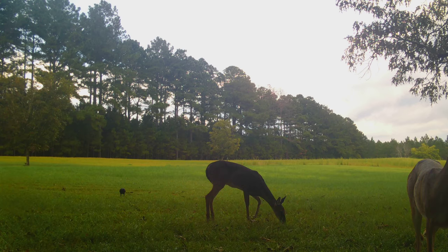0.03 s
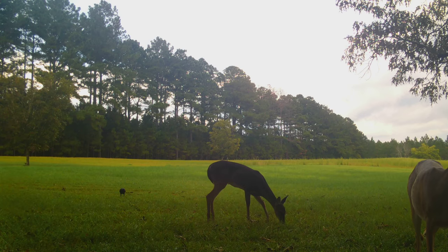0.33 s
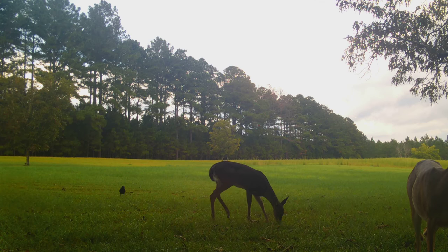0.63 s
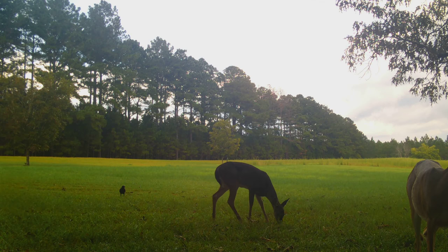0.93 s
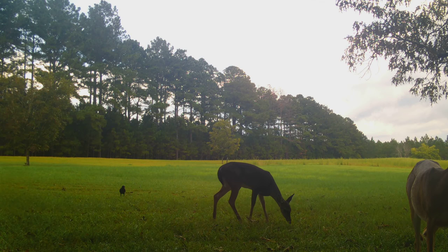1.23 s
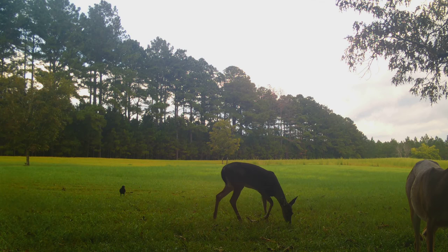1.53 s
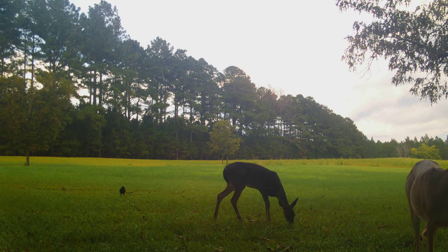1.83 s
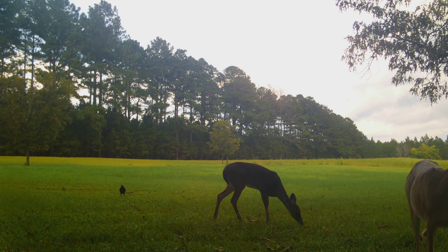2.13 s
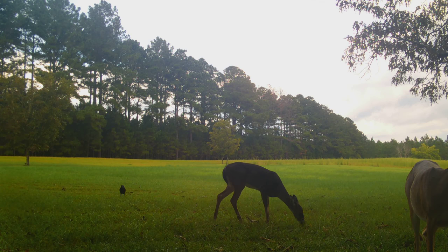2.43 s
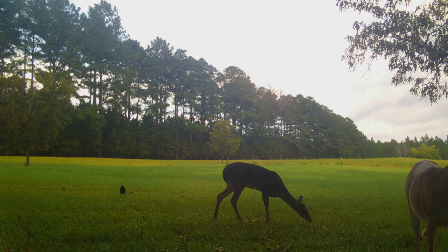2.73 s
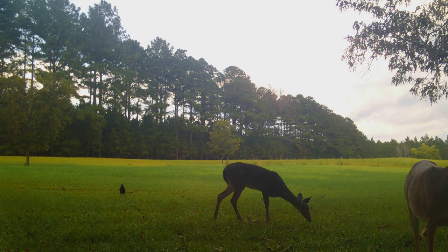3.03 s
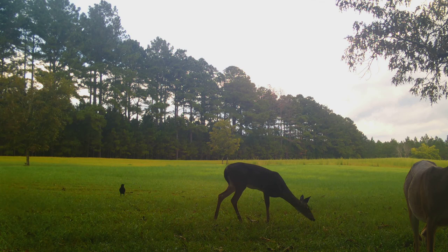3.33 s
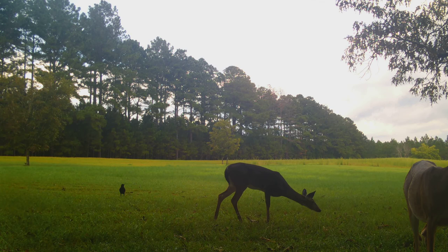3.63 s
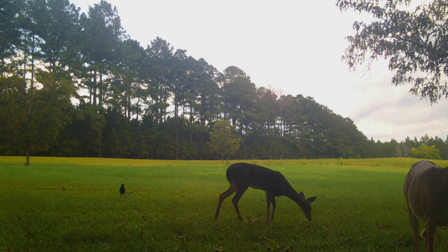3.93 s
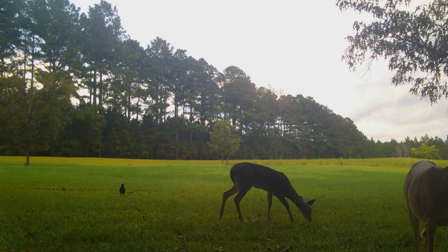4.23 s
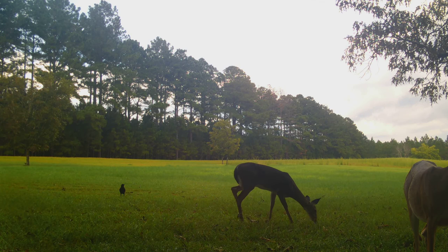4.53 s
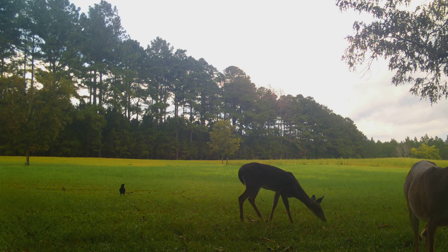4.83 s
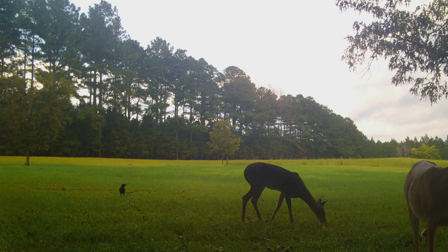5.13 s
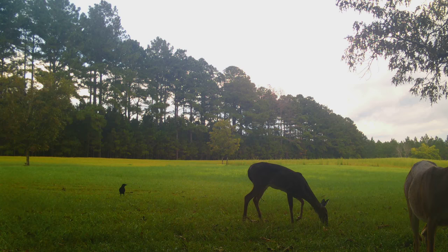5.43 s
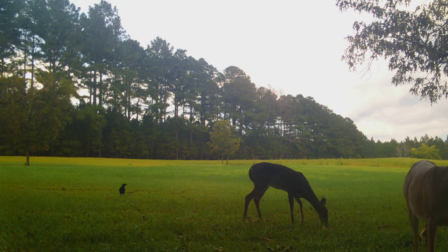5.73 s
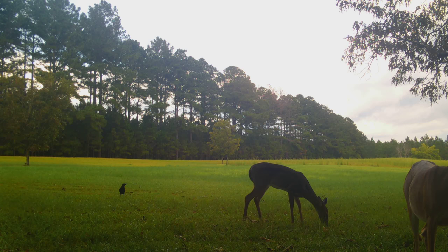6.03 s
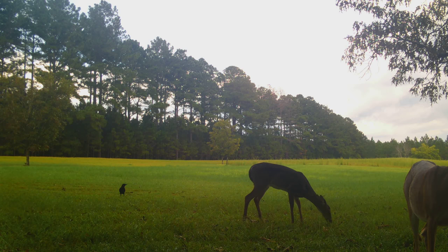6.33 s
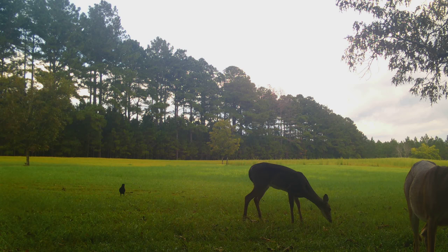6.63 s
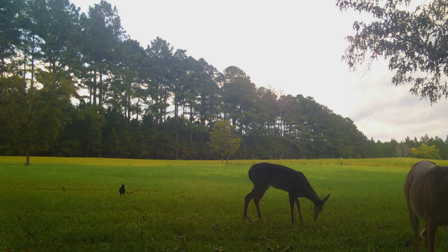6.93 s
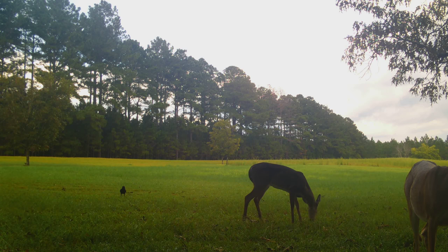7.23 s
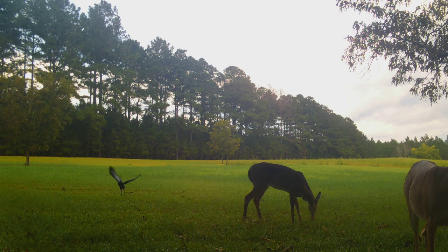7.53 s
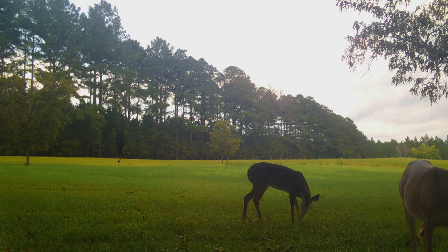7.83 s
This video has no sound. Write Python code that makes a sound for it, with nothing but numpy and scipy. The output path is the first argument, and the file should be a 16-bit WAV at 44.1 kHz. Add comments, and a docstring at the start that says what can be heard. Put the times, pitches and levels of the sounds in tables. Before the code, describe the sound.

A nearby crow caws harshly and a distant one answers over faint insect hiss, with small twig snaps and soft wingbeats.

```python
"""Two crows caw three times each at the edge of a meadow, heard through one mono microphone.
The near one is harsh and bright, the one across the field has a fast trill; both voices are puffs
of air from the syrinx ringing in the throat. The tree line answers faintly. Insects hiss over a low
outdoor rumble, grass tears and twigs snap as deer graze, and a bird flaps off at the end."""
import sys
import numpy as np
from scipy import signal
from scipy.fft import rfft, irfft, next_fast_len
from scipy.io import wavfile
from scipy.ndimage import uniform_filter1d, map_coordinates

SR = 44100
rng = np.random.default_rng(int(sys.argv[2]) if len(sys.argv) > 2 else 0)


def dump(signal):
    """Clip the signal to [-1, 1] and save it as 16-bit WAV at the path in sys.argv[1]."""
    limited = np.clip(np.atleast_2d(signal).T, -1, 1)
    pcm = np.round(limited * 32767).astype(np.int16)
    wavfile.write(sys.argv[1], SR, pcm)


N = 347508
TIME = np.arange(N) / SR
TOP_HZ = 15800


def amp(db):
    """Decibels to gain."""
    return 10 ** (np.asarray(db) / 20)


def unit(x):
    """Scale to rms 1."""
    return x / np.sqrt(np.mean(x ** 2) + 1e-20)


def steady(x, size=900):
    """Hold the short-time rms at 1."""
    return x / np.sqrt(np.abs(uniform_filter1d(x * x, size)) + 1e-12)


def along(points, hz):
    """Read (Hz, value) points on a log axis."""
    freqs, values = np.transpose(points)
    return np.interp(np.log(hz + 1), np.log(freqs + 1), values)


def ramp(t, begin, length):
    """Rise from 0 to 1 over length seconds."""
    return np.clip((t - begin) / length, 0, 1)


def swell(centre, width):
    """A bell of gain; width is its standard deviation in seconds."""
    return np.exp(-.5 * ((TIME - centre) / width) ** 2)


def gate(t, edge):
    """Short fades at both ends of a call."""
    return np.clip(np.minimum(t - t[0], t[-1] - t) / edge, 0, 1)


def wobble(t, rate):
    """A smooth random curve with rate knots a second."""
    knots = rng.standard_normal(4096)
    return map_coordinates(knots, [(t - t[0]) * rate], mode="wrap")


def add(track, start, x):
    """Mix x into the track from start seconds."""
    part = track[max(round(start * SR), 0):][:len(x)]
    part += x[:len(part)]


def noise(spectrum):
    """Noise of rms 1 with the given colour."""
    size = next_fast_len(N + 8192)
    gain = amp(along(spectrum, np.fft.rfftfreq(size, 1 / SR)))
    return unit(irfft(rfft(rng.standard_normal(size)) * gain, size)[:N])


def resonate(x, spectrum, size=2048):
    """Ring x through a causal filter of the given colour."""
    gain = amp(along(spectrum, np.fft.rfftfreq(size, 1 / SR)))
    cepstrum = irfft(np.log(gain))
    cepstrum[1:size // 2] *= 2  # fold to minimum phase
    cepstrum[size // 2 + 1:] = 0
    impulse = irfft(np.exp(rfft(cepstrum)))
    return signal.fftconvolve(x, impulse)[:len(x)]


# Open air and two insect choruses around the microphone. Each row: frequency in Hz, density in dB.
AIR_SPECTRUM = [(12, -37), (20, -1), (65, -0.5), (86, -2.5), (196, -4), (250, -6), (456, -10), (1480, -20),
                (3430, -27), (4000, -25), (5200, -24.5), (8800, -120)]
LOW_CHORUS = [(3000, -14.5), (4500, -12.5), (5700, -6.5), (6600, -0.5), (7300, -6.5), (8200, -9),
              (9500, -31.5)]
HIGH_CHORUS = [(8000, -25.5), (9200, -6), (9900, -0.5), (10350, 1.5), (11000, -5), (11500, -16),
               (13000, -22)]


def meadow():
    """Distant rumble, faint hum, even hiss and insects; the low chorus fades, the high one holds."""
    rumble_db = -56.5 + 2 * ramp(TIME, begin=6, length=1.4)
    rumble = amp(rumble_db) * noise(AIR_SPECTRUM)
    hum = amp(-66) * noise([(50, -31), (58, -6), (66, -19), (20000, -120)])
    hiss = amp(-64) * noise([(1000, -10.5), (4000, -11), (9000, 0), (12000, -9), (16000, -9.5)])
    shimmer = amp(.4 * wobble(TIME, 12))
    low_db = -56.3 - .5 * TIME - 7 * ramp(TIME, begin=6.66, length=.65)
    low_insects = amp(low_db) * shimmer * noise(LOW_CHORUS)
    high_insects = amp(-58 + .6 * wobble(TIME, 30)) * noise(HIGH_CHORUS)
    return rumble + hum + hiss + low_insects + high_insects


# Twigs breaking. Each row: start in seconds, peak in dB, crack in Hz, wood against crack in dB.
TWIG_SNAPS = [(.158, -44.5, 3300, -25), (1.765, -45, 4500, -12), (4.119, -45, 3500, -2),
              (5.679, -41, 4200, -9), (6.684, -40, 12500, -30), (6.732, -35, 9800, -28),
              (7.128, -45, 8000, -20), (7.344, -32, 5500, 0)]
# A dry twig's body. Each row: frequency in Hz, gain in dB.
TWIG_BODY = [(700, -25), (1200, -2), (1500, -9), (1950, 1), (2600, -15), (3500, -6), (6000, -26),
             (12000, -50)]


def twigs():
    """Each breaking stem is a brief crack over the ring of its wood."""
    track, t = np.zeros(N), np.arange(SR // 20) / SR
    for start, peak_db, hz, body_db in TWIG_SNAPS:
        burst = rng.standard_normal(len(t)) * (amp(-60 * t / .0074) + amp(-24 - 60 * t / .032))
        colour = [(hz / 4, -24), (hz * .71, -8), (hz, 0), (hz * 1.43, -10), (hz * 2.2, -30)]
        crack = unit(resonate(burst, colour))
        snap = crack + amp(body_db) * unit(resonate(burst, TWIG_BODY))
        add(track, start, amp(peak_db) * snap / np.abs(snap).max())
    return track


# Deer tugging at the grass. Each row: centre in seconds, width in seconds, level in dB.
GRASS_TUGS = [(.3, .06, -61), (.88, .046, -61), (1.745, .05, -57.5), (4.55, .05, -59), (5.67, .022, -58),
              (5.948, 0.051, -59), (6.38, .03, -63)]
# Tearing blades. Each row: frequency in Hz, density in dB.
GRASS_SPECTRUM = [(1500, -20), (3500, -4), (7000, 4), (12500, -1), (16000, -25)]


def grazing():
    """Blades of grass tear in small crackling clumps."""
    tugs = sum(amp(level_db) * swell(centre, width) for centre, width, level_db in GRASS_TUGS)
    return tugs * unit(noise(GRASS_SPECTRUM) * amp(4 * wobble(TIME, 400)))


def syrinx(phase, pitch, breath, count=40):
    """One sharp puff per cycle, with a burst of turbulence at each opening."""
    harmonic = np.arange(1, count + 1)[:, None]
    puffs = np.sum(np.cos(harmonic * phase) * (harmonic * pitch < TOP_HZ), axis=0)
    turbulence = rng.standard_normal(len(phase)) * (1 + np.cos(phase)) ** 2
    return unit(puffs) + breath * unit(turbulence)


def trill(t, rate_hz, drift):
    """A fast, slightly unsteady tremble of the voice."""
    hz = rate_hz * (1 + drift * wobble(t, 40.34))
    return np.sin(2 * np.pi * np.cumsum(hz) / SR)


def hollow(x, spacing_hz, share):
    """One close, inverted reflection cuts evenly spaced dips into the spectrum."""
    hz = np.fft.rfftfreq(len(x), 1 / SR)
    return irfft(rfft(x) * (1 - share * np.exp(-2j * np.pi * hz / spacing_hz)), len(x))


def near_gesture(t, length, top_hz, crest_db, swell_db):
    """Pitch and levels of a near caw: it climbs, sags, then collapses as the breath runs out."""
    climb_s, sag_hz_per_s, collapse_s, slack_hz = .061, 1520, .054, 262
    crest_s, beak_opens_s = .122, .04
    climb_left = 1 - ramp(t, 0, climb_s)
    pitch = top_hz * (1 - .29 * climb_left ** 1.55) - sag_hz_per_s * np.maximum(t - climb_s, 0)
    pitch += (slack_hz - pitch) * ramp(t, length - collapse_s, collapse_s) ** 1.3
    tone_db = -27.2 + .052 * (pitch - top_hz) - 1.8 * climb_left
    # the rasp swells to a crest, then fades ever faster
    rasp_db = crest_db - swell_db * (1 - ramp(t, 0, crest_s) ** 2)
    rasp_db -= 27 * ramp(t, crest_s, length - crest_s) ** 2.46
    # the throat rings until the beak opens wide
    ring_db = -6.5 - np.maximum(100 * (beak_opens_s - t), 520 * (t - beak_opens_s))
    return pitch, tone_db, rasp_db, ring_db


# The near crow's throat with beak open, with beak half shut, and its hoarse middle range.
# Each row: frequency in Hz, gain in dB.
OPEN_BEAK = [(1000, -43), (1450, -7.5), (2000, -16), (2700, -17), (3400, -13.5), (4100, -8), (4650, -10),
             (5050, 2), (6500, -1.5), (6950, -14.5), (7900, -7.5), (9500, -17), (11600, -27),
             (12200, -20.5), (12900, -28.5), (15200, -34), (16000, -50)]
HALF_SHUT_BEAK = [(2800, -35.5), (3230, -18), (3380, -5.5), (3540, -7), (3700, -13), (4200, -36.5)]
HOARSE_BAND = [(1100, -34.5), (1550, 3.5), (1850, 4.5), (2100, -7), (2400, 3.5), (2800, -13.5), (3200, -4),
               (4200, -0.5), (4900, -25)]
SCOOP_S = .014  # the voice slides up before the rasp breaks in


def near_caw(length, top_hz, crest_db, swell_db):
    """A trembling arch of pitch: two clean low partials, a hoarse middle and a bright rasp of puffs."""
    t = np.arange(-SCOOP_S, length, 1 / SR)
    pitch, tone_db, rasp_db, ring_db = near_gesture(t, length, top_hz, crest_db, swell_db)
    voiced = ramp(t, -SCOOP_S, SCOOP_S)
    tremble = 1 + .024 * trill(t, rate_hz=80, drift=.25) + .019 * wobble(t, 200)
    pitch = pitch * (.82 + .18 * voiced) * tremble
    phase = 2 * np.pi * np.cumsum(pitch) / SR
    # the second partial swells as it climbs into the throat's first resonance
    second_db = along([(900, -14), (1120, -7), (1320, 7.7), (1550, 8.7)], 2 * pitch)
    second = amp(second_db + 3.6 * wobble(t, 220)) * np.sin(2 * phase + .4 * wobble(t, 349.8))
    tone = amp(tone_db) * voiced ** 2 * steady(np.sin(phase) + second)
    # the puffs come unevenly, most of all when the voice is slack and low
    slack = np.interp(pitch, [350, 580], [.14, .035])
    uneven = phase + .05 * np.sin(phase / 2) + slack * wobble(t, 700)
    puffs = syrinx(uneven, pitch, breath=.2) * amp(.8 * np.cos(phase / 2) + .8 * wobble(t, 500))
    rasp = steady(hollow(resonate(puffs, OPEN_BEAK), spacing_hz=2355, share=.2))
    ring = amp(ring_db) * steady(resonate(puffs, HALF_SHUT_BEAK))
    # fluttering membranes chop the puffs and throw sidebands between the partials
    flutter = trill(t, rate_hz=210, drift=.2) + .5 * wobble(t, 300)
    hoarse = amp(-17) * steady(resonate(puffs * flutter, HOARSE_BAND))
    breaking = .22 * voiced + .78 * ramp(t, -.0022, .0028)
    rasp_gain = amp(rasp_db + 1.1 * wobble(t, 140) + .4 * wobble(t, 45)) * breaking
    return (tone + rasp_gain * (rasp + ring + hoarse)) * gate(t, edge=.004)


def puff(peak_db):
    """One lone opening of the syrinx, ringing in the throat."""
    t = np.arange(SR // 50) / SR
    burst = rng.standard_normal(len(t)) * amp(-60 * t / .0073)
    sound = resonate(burst, OPEN_BEAK) + .49 * resonate(burst, HALF_SHUT_BEAK)
    return amp(peak_db) * sound / np.abs(sound).max()


# Caws close to the microphone. Each row: start in seconds, length in seconds, top pitch in Hz,
# rasp at its crest in dB, swell up to the crest in dB.
NEAR_CALLS = [(2.064, .214, 764, -16.3, 3.6), (2.414, .226, 714, -18.4, 4), (2.857, .233, 716, -19, 3.6)]
# Lone puffs ahead of each caw. Each row: lead in seconds, relative level in dB.
VOICE_CATCH = [(.017, -13.5), (0.0085, -5), (0.0021, -11)]


def near_crow():
    """Three harsh caws at close range, the voice catching before each."""
    track = np.zeros(N)
    for start, length, top_hz, crest_db, swell_db in NEAR_CALLS:
        add(track, start - SCOOP_S, near_caw(length, top_hz, crest_db, swell_db))
        for lead, puff_db in VOICE_CATCH:
            add(track, start - lead, puff(crest_db - swell_db + puff_db + 9))
    return track


# Ring of the tree line. Each row: frequency in Hz, time to fall 60 dB in seconds.
TREE_DECAY = [(1100, 1.1), (1600, 1.8), (2200, 1.2), (3500, 3.4), (6000, 1.7), (12000, 0.81)]


def trees(near, far):
    """Nearby trunks and leaves scatter both crows, and the tree line answers from farther off."""
    scatter_t60s = [(500, .085), (1100, .2), (1500, .42), (2400, .25),
                    (3500, .4), (6000, .28), (12000, .28)]
    scatter = echo(amp(-8) * near + amp(-13.5) * far, scatter_t60s, rise=.018)
    woods = echo(amp(-26.5) * near + amp(-22.5) * far, TREE_DECAY, rise=.04)
    round_trip_s = .27
    add(woods, round_trip_s, amp(-7) * woods)
    return scatter + woods


def echo(x, t60s, rise):
    """A diffuse tail that builds up over rise seconds and dies at each frequency's own speed."""
    hz, t, bands = signal.stft(rng.standard_normal(3 * SR // 2), SR, nperseg=256)
    envelope = amp(-60 * t / along(t60s, hz)[:, None]) * (1 - np.exp(-t / rise))
    tail = signal.istft(bands * envelope, SR, nperseg=256)[1]
    return signal.fftconvolve(x, tail / np.linalg.norm(tail))[:N]


def far_gesture(t, length, top_hz):
    """Pitch, effort and trill depth of a far caw: it climbs, holds, sags, tires and drops."""
    climb_s, hold_s, sag_s, release_s = .043, .072, .095, .035
    climb_left = (1 - ramp(t, 0, climb_s)) ** 1.7
    sag = 1 - np.exp(-np.maximum(t - hold_s, 0) / sag_s)
    tired = ramp(t, begin=.12, length=.13)
    release = ramp(t, length - release_s, release_s)
    pitch = top_hz * (1 - .28 * climb_left) * (1 - .22 * sag) * (1 - .121 * release)
    effort_db = -10 * climb_left - 4.5 * tired - 9 * release
    trill_depth = .04 + .048 * tired
    return pitch, effort_db, trill_depth


# Caws across the field. Each row: start in seconds, length in seconds, top pitch in Hz, level in dB.
FAR_CALLS = [(2.466, .361, 631.5, -28.2), (3.10, 0.37, 628, -28.5), (3.742, 0.36, 629, -29)]
# That crow's throat as heard at the microphone. Each row: frequency in Hz, gain in dB.
DISTANT_THROAT = [(300, -23), (500, -21), (630, -34), (800, -40), (1200, -17), (1550, 2.5), (1850, -0.5),
                  (2150, -15), (2600, -25.5), (3600, -16), (4300, -28), (5200, -13.5), (6400, -5),
                  (7800, -23.5), (11000, -30), (15000, -56)]


def far_crow():
    """Three longer caws from across the field, their trill deepening as the voice sinks."""
    track = np.zeros(N)
    lowpass = signal.butter(4, 2600, fs=SR, output="sos")
    for start, length, top_hz, level_db in FAR_CALLS:
        t = np.arange(0, length, 1 / SR)
        pitch, effort_db, depth = far_gesture(t, length, top_hz)
        pitch *= 1 + depth * trill(t, rate_hz=61, drift=.052) + .011 * wobble(t, 400)
        phase = 2 * np.pi * np.cumsum(pitch) / SR
        puffs = syrinx(phase + .11 * wobble(t, 800), pitch, breath=.27)
        voice = steady(resonate(puffs, DISTANT_THROAT), size=1500)
        # the upper partials fade faster than the body as the effort drops
        body = signal.sosfiltfilt(lowpass, voice)
        voice = body + amp(.4 * effort_db) * (voice - body)
        add(track, start, amp(level_db + effort_db) * voice * gate(t, edge=.002))
    return track


# Wing strokes. Each row: centre in seconds, width in seconds, push in dB, swish in dB.
WINGBEATS = [(7.614, .035, -56, -62), (7.746, 0.029, -48, -55), (7.862, 0.028, -56, -50)]
# Pushed air and swishing feathers. Each row: frequency in Hz, density in dB.
PUSH_SPECTRUM = [(30, -4), (80, 3), (170, 2), (380, 0), (560, -23), (1500, -19.5), (6000, -15.5),
                 (15000, -48)]
SWISH_SPECTRUM = [(1500, -16), (2800, 2), (4200, -4), (6300, 3), (9000, -2), (12500, -3), (16000, -25)]


def wings():
    """A bird takes off: each stroke is a soft low push of air with a swish of feathers."""
    push = unit(noise(PUSH_SPECTRUM) * amp(4 * wobble(TIME, 60)))
    swish = unit(noise(SWISH_SPECTRUM) * amp(3.7 * wobble(TIME, 300)))
    return sum(swell(centre, width) * (amp(push_db) * push + amp(swish_db) * swish)
               for centre, width, push_db, swish_db in WINGBEATS)


def scene():
    """One microphone at the meadow's edge, the same in both channels."""
    near, far = near_crow(), far_crow()
    mono = near + far + trees(near, far) + meadow() + twigs() + grazing() + wings()
    return np.array([mono, mono])


def record(dry):
    """Nothing above the band limit is kept."""
    size = next_fast_len(N + 8192)
    in_band = np.fft.rfftfreq(size, 1 / SR) < TOP_HZ
    return irfft(rfft(dry, size) * in_band, size)[:, :N]


dry = scene()
out = record(dry)
dump(out)
```